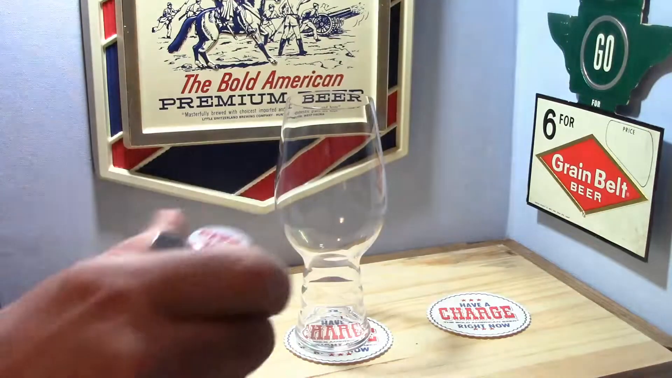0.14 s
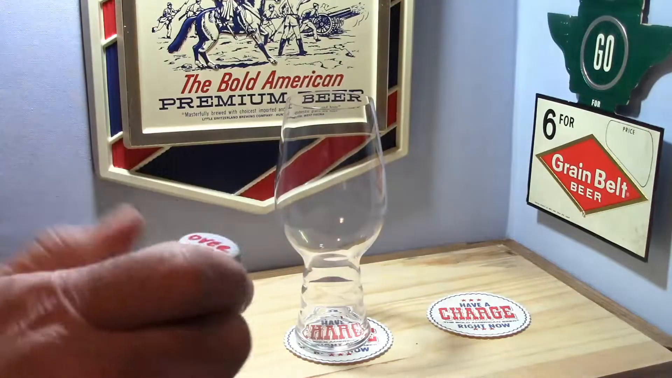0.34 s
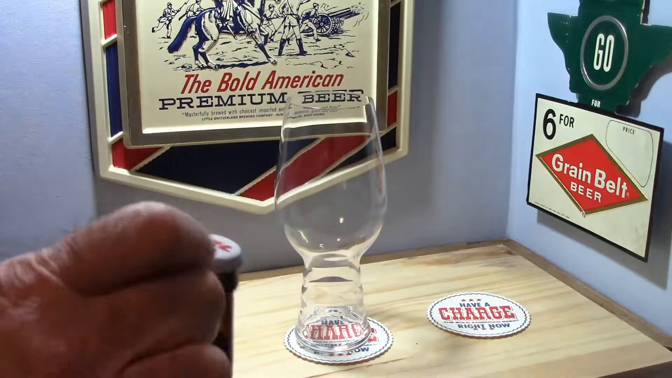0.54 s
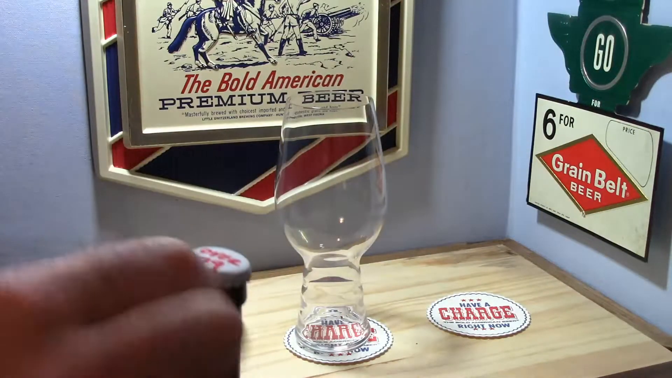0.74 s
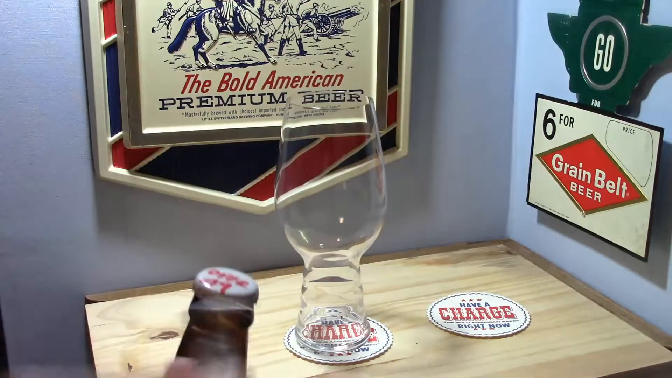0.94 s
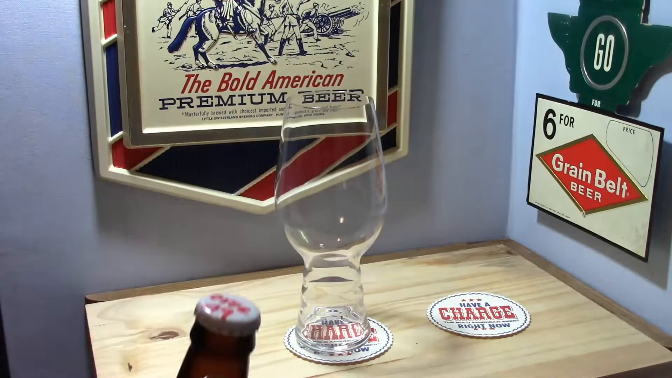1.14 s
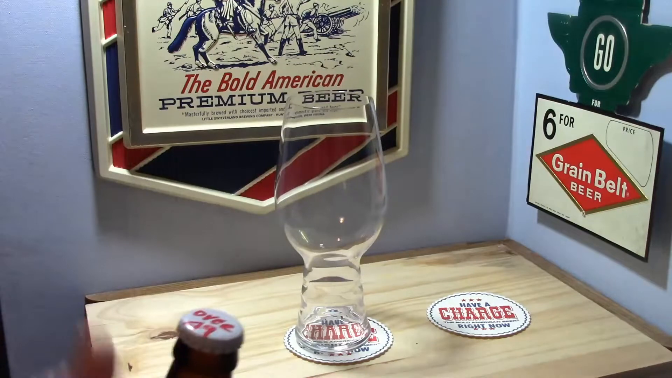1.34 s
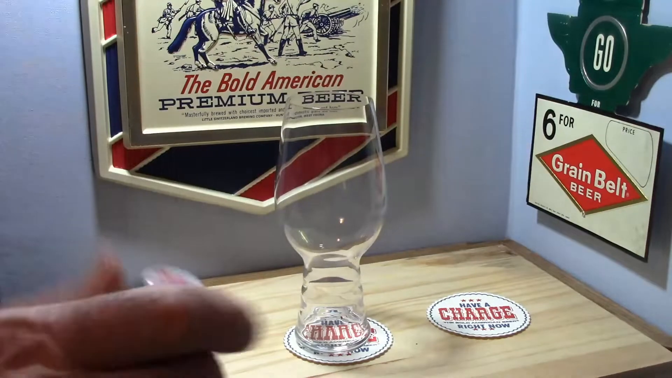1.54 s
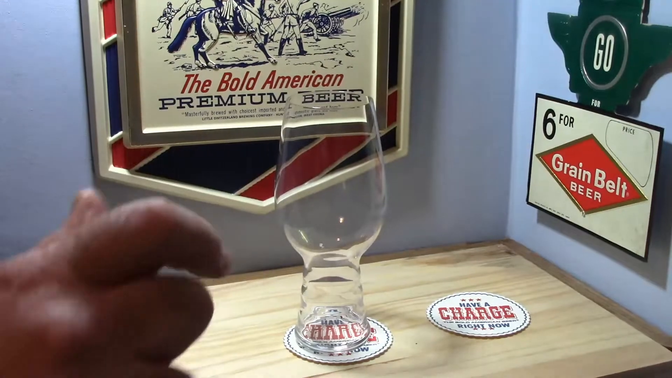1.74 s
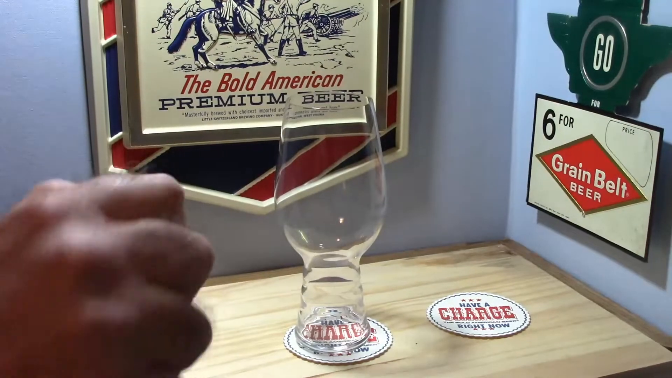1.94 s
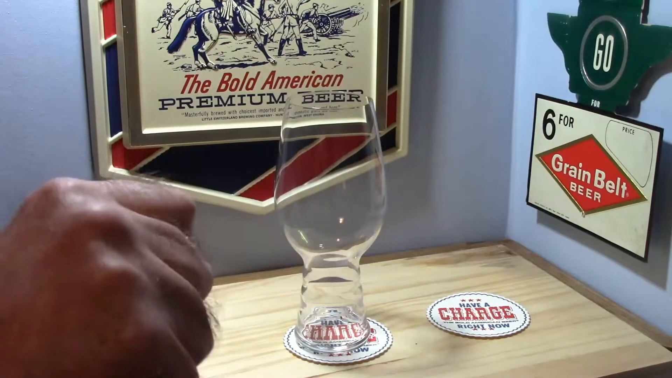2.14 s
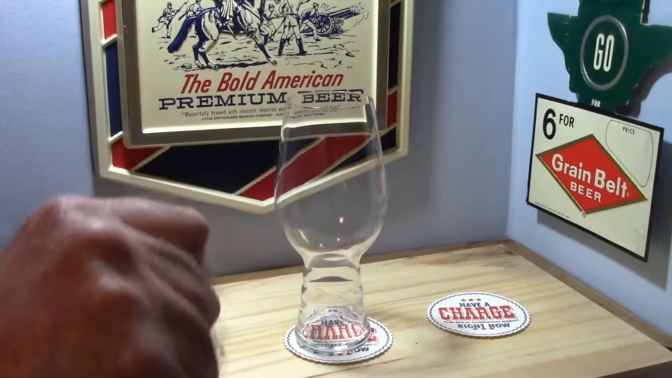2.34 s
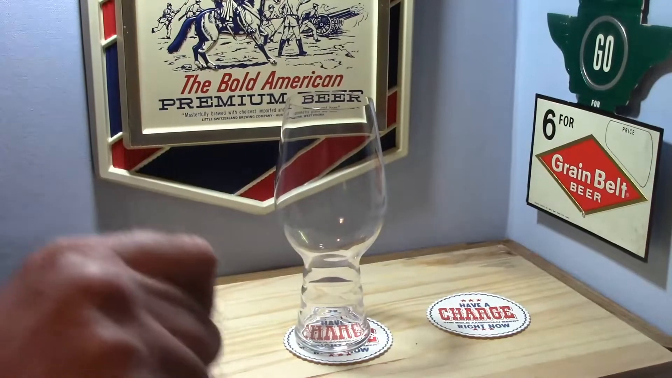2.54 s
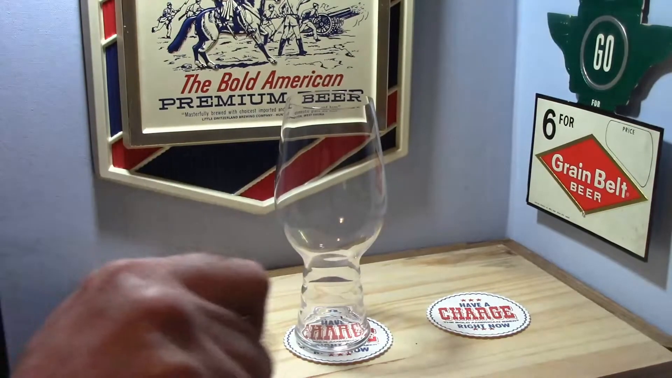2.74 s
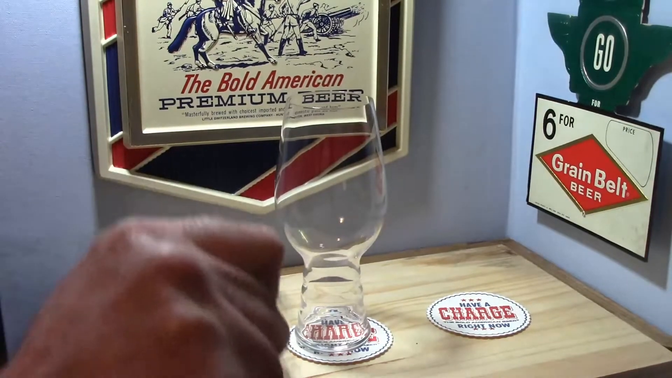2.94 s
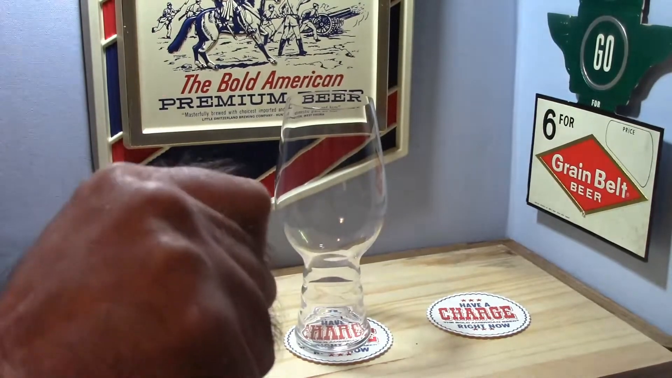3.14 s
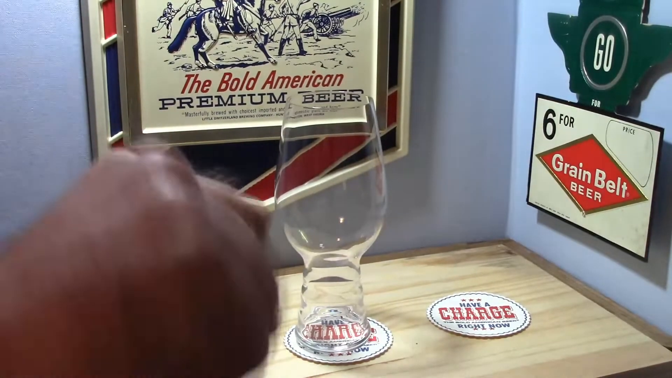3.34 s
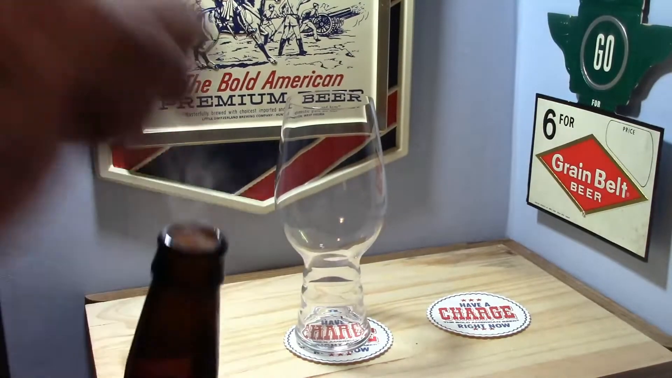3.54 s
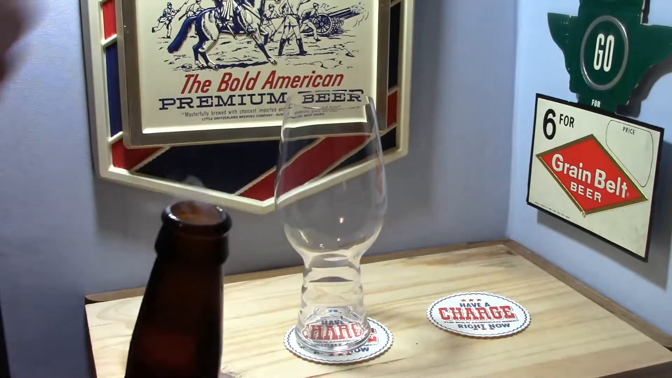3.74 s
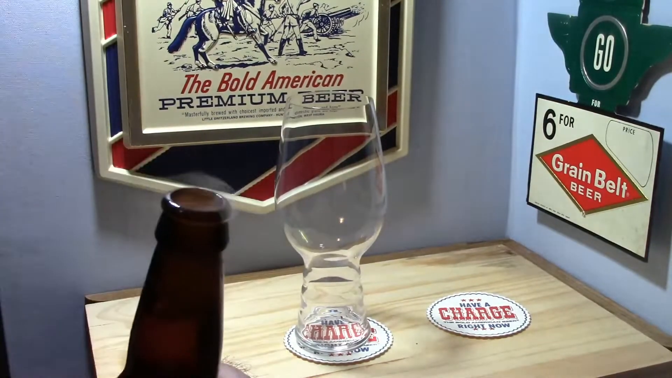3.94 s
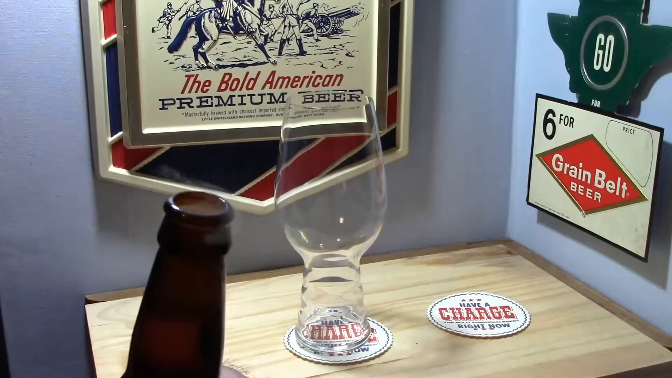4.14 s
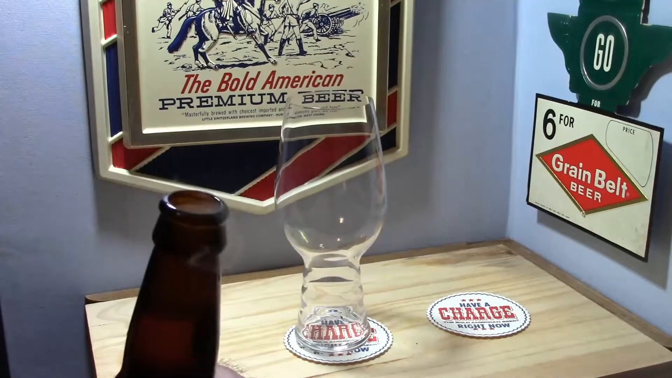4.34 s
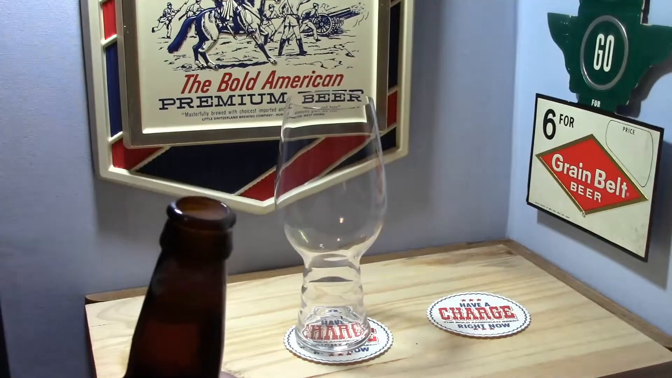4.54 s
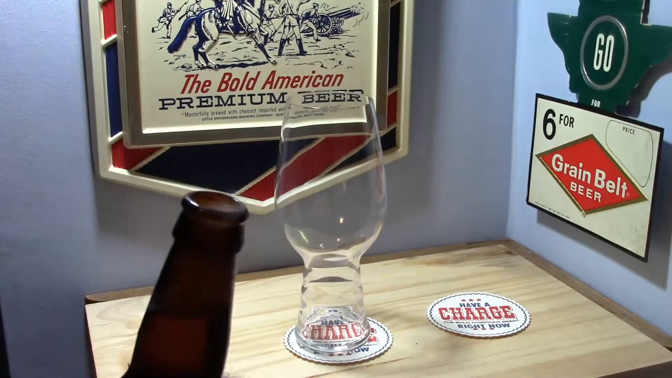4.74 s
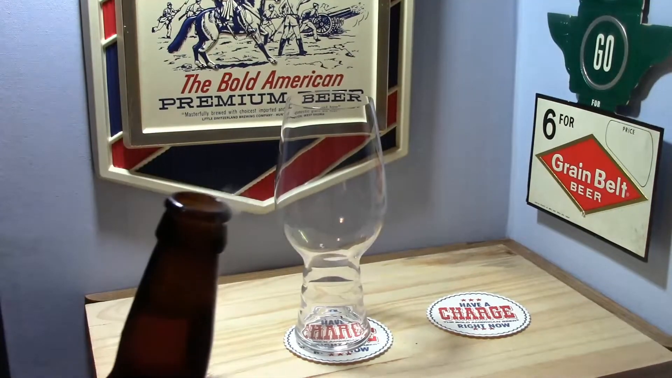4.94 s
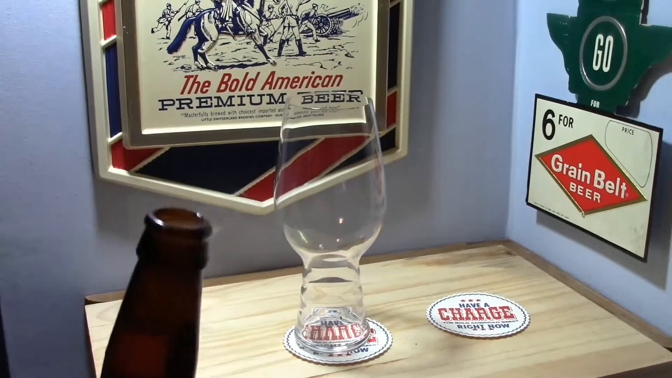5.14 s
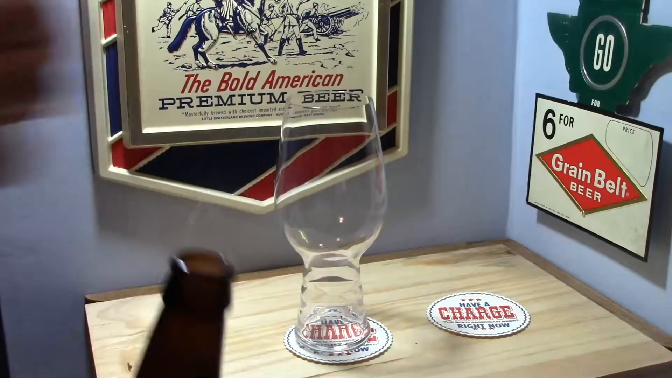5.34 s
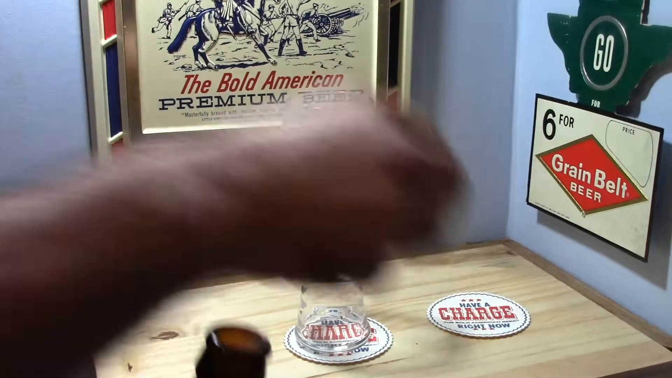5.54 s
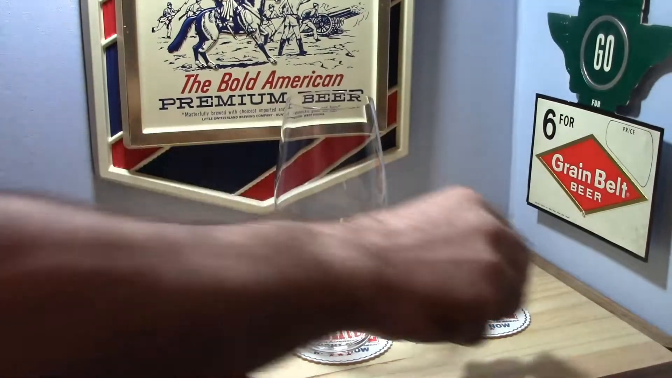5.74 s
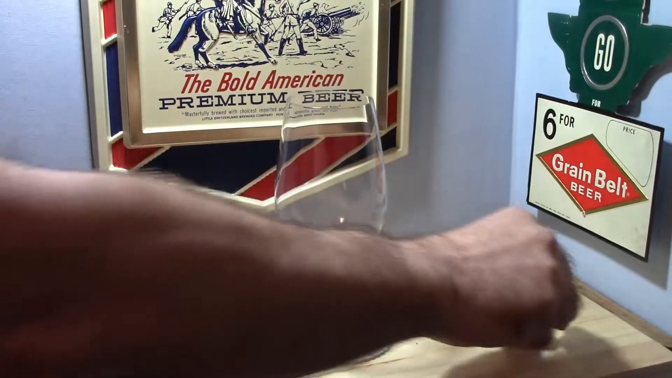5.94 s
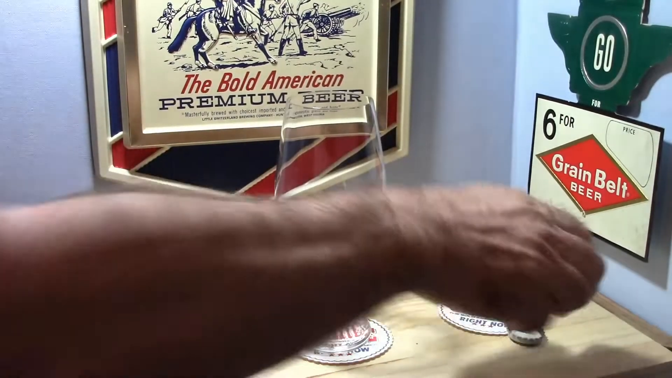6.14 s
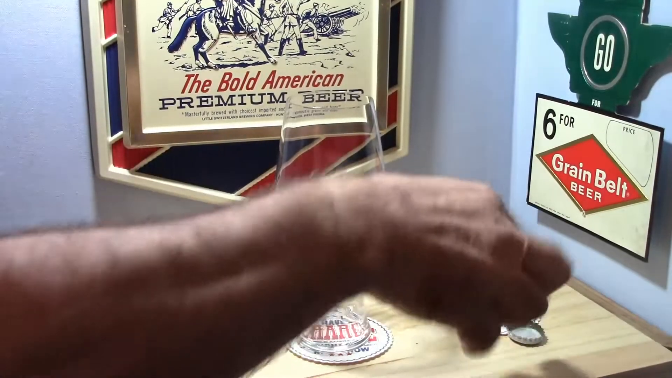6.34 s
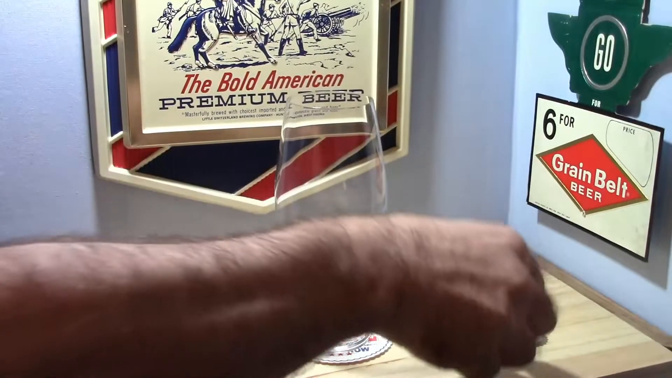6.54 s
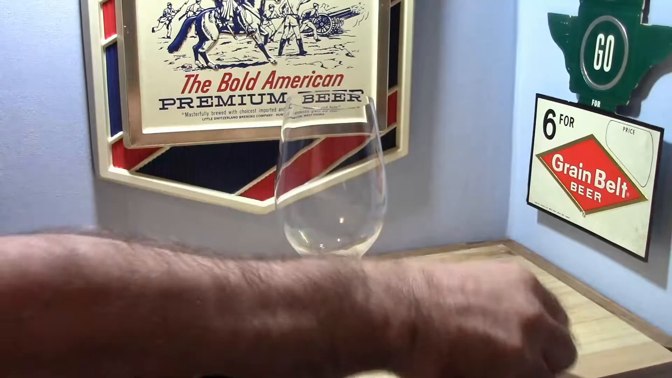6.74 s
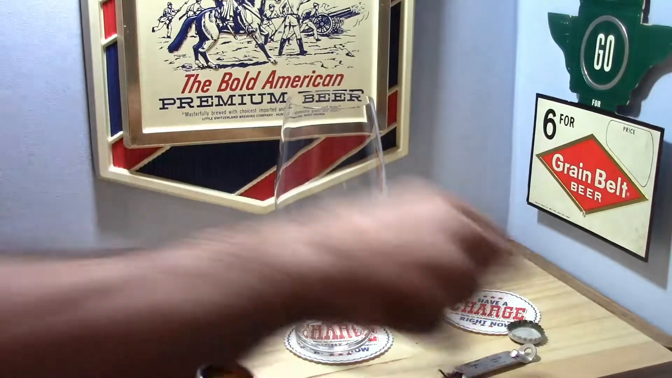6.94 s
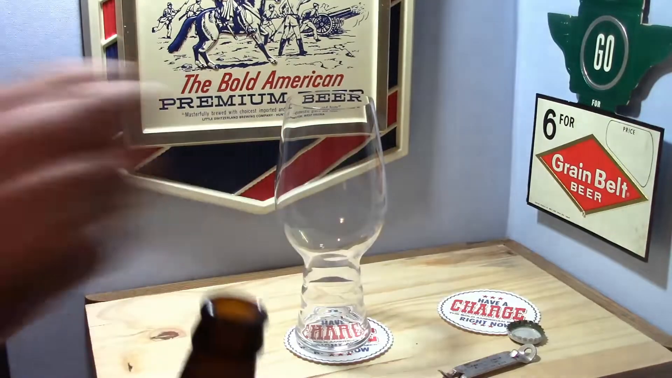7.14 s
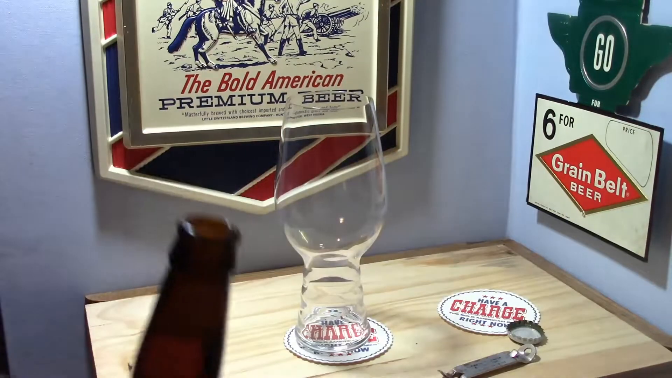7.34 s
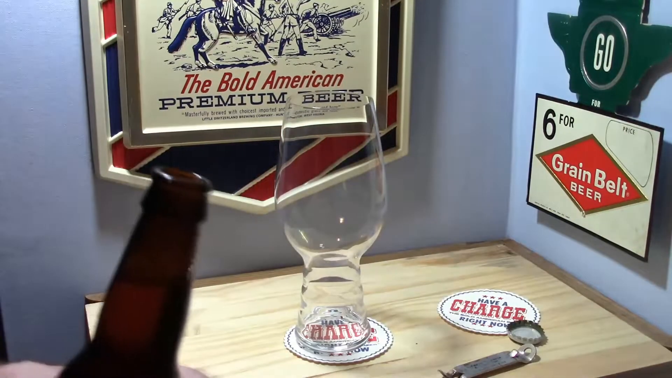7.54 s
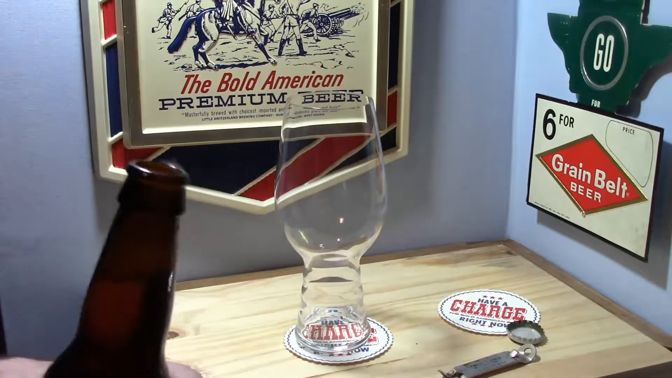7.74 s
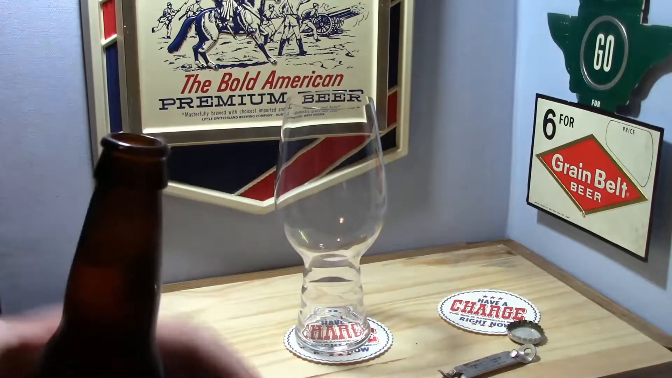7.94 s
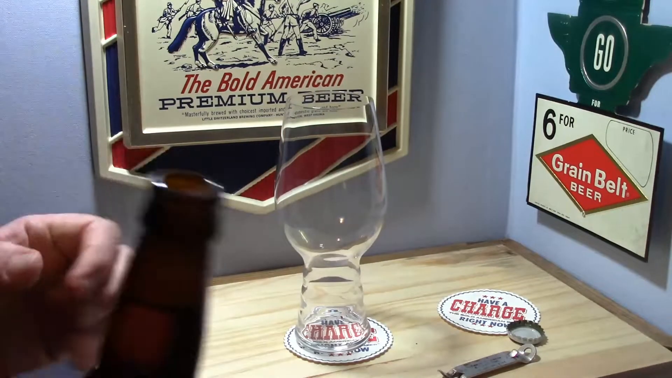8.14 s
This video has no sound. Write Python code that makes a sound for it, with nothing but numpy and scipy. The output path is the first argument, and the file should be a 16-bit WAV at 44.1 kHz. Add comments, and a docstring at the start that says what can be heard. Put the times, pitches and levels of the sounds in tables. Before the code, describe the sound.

A glass bottle is opened close to the microphone in a small indoor corner with short reflections, over faint hiss and slight sleeve rustle. From about 1.5 to 1.9 seconds a steel opener taps lightly on the cap a few times. At 3.3 seconds the seal breaks with a loud, very short hiss of gas, followed at 3.4 by a small hollow pop and a brief ring from the freed cap. Cap and opener click together in the hand around 3.5 seconds, then click again at 4.5 and scrape and rattle softly until 4.9. At 6 seconds the cap lands on a wooden shelf with a sharp, bright clink. Around 6.8 seconds the opener is put down with a loud, quick clatter on the wood. Only faint hiss and rustle remain until the end, just after 8 seconds.

```python
"""A steel opener taps and pries the crown cap off a glass bottle: gas whistles out of the gap, air in
the neck pops, the freed cap rings. Cap and opener rattle and scrape in the hand, then are laid on a
pine shelf in a narrow, reflective corner. Each contact is a broadband crack plus ringing modes.
A small camera close by hisses, its lens motor ticks, and sleeves rustle faintly."""
import sys
import numpy as np
from scipy import signal
from scipy.fft import rfft
from scipy.io import wavfile
from scipy.ndimage import uniform_filter1d

SR = 44100
rng = np.random.default_rng(int(sys.argv[2]) if len(sys.argv) > 2 else 0)


def to_wav(sig):
    """Store sig (one row per channel, or 1-D mono) as 16-bit WAV at the path in sys.argv[1].

    Samples outside -1..1 are clipped; the rate is SR.
    """
    pcm = np.clip(np.atleast_2d(sig), -1, 1) * 32767
    pcm = np.round(pcm).astype(np.int16)
    wavfile.write(sys.argv[1], SR, pcm.T)  # frames by channels


N = 361721

# Noise spectra: (frequency [Hz], relative density [dB])
HISS_SPECTRUM = [(12, -47), (20, -18), (74, -11.5), (113, -4), (301, -4), (328, -6.5), (357, 1.5),
                 (574, -10), (624, -6), (1260, -12), (2320, -15.5), (2750, -17), (16000, -33.5)]
CLOTH_SPECTRUM = [(12, -51.5), (20, -14), (113, 1), (422, 1.5), (472, -1), (718, -2.5), (1330, -8),
                  (8180, -19.5), (16000, -34.5)]
STEEL_SPECTRUM = [(300, -47), (900, -12.5), (2300, -7.5), (5000, -6), (6600, -4.5), (8000, -12),
                  (11000, -16), (14000, -26), (16000, -23)]
WOOD_SPECTRUM = [(30, -47.5), (100, -45.5), (270, -36.5), (900, 0), (2000, 0.5), (3500, -6), (6300, -16.5),
                 (9000, -32), (12000, -60), (16000, -70.5)]
JET_SPECTRUM = [(18, -86.5), (30, -36.5), (194, -37.5), (540, -24.5), (1280, -25.5), (1430, -14),
                (1810, -8.5), (2060, -4.5), (3140, -1.5), (3670, -5), (6550, -5), (13000, -17),
                (16000, -23.5)]
# Background stereo image: (frequency [Hz], left-right correlation [-])
CORRELATION = [(60, 0.28), (130, 0.61), (290, 0.2), (640, 0.39), (1410, 0.44), (3100, 0.42), (6820, 0.95),
               (15000, 0.92)]
# Sleeve and skin movement: (time [s], level [dB])
RUSTLE_LEVELS = [(0, -57.5), (1.3, -56.5), (1.6, -59), (2.2, -64), (4.2, -66), (4.9, -61), (5.7, -60.5),
                 (6.3, -66), (6.95, -67), (7.1, -61.5), (7.28, -58.5), (7.4, -69.5), (8.21, -65.5)]
# Corner reflections: (frequency [Hz], T60 [s])
CORNER_DECAY = [(100, 0.083), (300, 0.25), (700, 0.2), (1500, 0.16), (3000, .16), (6000, .14), (12000, .12)]
# Corner width: (frequency [Hz], side re mid [dB])
CORNER_WIDTH = [(60, -13.5), (250, -24.5), (700, -25), (1500, -23.5), (3000, -21), (6000, -19.5),
                (10000, -12), (15000, -5)]
# Cap and shelf resonances: (frequency [Hz], level [dB], T60 [s])
SEATED_CAP_MODES = [(3350, 0, .04), (6210, -5, .035), (3140, -7, .03), (3450, -9, .025), (1500, -2, .008),
                    (2950, -9, .012), (5300, -16, .01), (6450, -10, .012), (7850, -2, .012),
                    (9400, -14, .01), (10300, -12, .01)]
HELD_CAP_MODES = [(2410, -5, 0.021), (2670, 23, 0.0025), (3660, 15, 0.0058), (4700, 14, 0.002),
                  (5800, 20, 0.0035), (6376, 9, 0.029), (6830, -52.5, 0.0091), (9640, 5, 0.0018),
                  (10000, 4, .006), (12800, -5, .006)]
LOOSE_CAP_MODES = [(6277, 0, .05), (6335, -4, .045), (5260, -18, .015), (3800, -16, .015),
                   (10070, -26, .02)]
SHELF_MODES = [(299, -14, .3), (1091, -1, .13), (1321, -1, .16), (1996, -7, .1), (2030, -3, .14),
               (145, -28, .1), (503, -12, .08), (622, -6.5, .1), (795, -6.5, .1), (1583, -7, .04),
               (1776, -6, .05), (2370, -10, .04), (2960, -11, .04), (3220, -13, .05), (3600, -15, .03),
               (4540, -24, .03), (5300, -26, .03), (6280, -26, .04)]
# Contacts: (time [s], strength [dB], favoured pitch [Hz], chatter decay [s])
OPENER_TAPS = [(1.536, -45.5, 3540, 0.0039), (1.7462, -29, 4780, 0.0048), (1.8655, -21, 3520, 0.0021),
               (1.878, -28, 3050, 0.0015), (1.9105, -43.5, 2610, 0.0025)]
HAND_RATTLES = [(3.402, -29.5, 5700, 0.002), (3.5025, -32, 3000, 0.013), (3.559, -35, 5930, .006),
                (3.5628, -26.5, 6300, 0.0054), (4.4915, -23.5, 6200, 0.0063), (4.551, -43, 3980, 0.01),
                (4.6525, -42.5, 3230, 0.015), (4.816, -49, 2570, .006), (4.8305, -33, 2000, .0043),
                (4.852, -40, 2740, 0.0057)]
CAP_LANDINGS = [(6.0276, -10.5, 6300, .006), (6.035, -14, 6300, 0.0034), (6.044, -17, 6280, 0.0044)]
SHELF_KNOCKS = [(5.549, -47.5, 755, .016), (6.029, -24.5, 3447, .023), (6.034, -27, 1032, 0.0137),
                (6.706, -25, 800, .013), (6.7545, -15.5, 1020, .018), (6.7735, -7, 2110, .011),
                (6.785, -11, 1359, .013)]  # knuckle, cap, opener
FINGER_TOUCHES = [(1.107, -57.5, 6800, .0053), (1.419, -55, 2460, 0.011), (2.057, -42.5, 1670, 0.0038),
                  (2.38, -49, 3550, 0.0054), (3.859, -59.5, 4500, .006), (4.374, -54, 2350, .011),
                  (5.309, -64, 6910, .0098), (5.425, -53, 3450, 0.019), (7.799, -65, 7500, 0.0052),
                  (7.849, -65, 7600, .005), (7.925, -66, 7000, 0.0085)]
# Air in the neck: (time [s], level [dB], final pitch [Hz], T60 [s])
NECK_POPS = [(3.398, -27.5, 665, .13), (3.503, -45, 1013, 0.12)]
# Freed cap: (time [s], level [dB], frequency [Hz], T60 [s])
CAP_RINGS = [(3.407, -28, 2440, 0.085)]
# Contact types: (ring re crack [dB], tilt at 2 kHz favoured pitch [dB/oct],
# tilt change per octave of that pitch [dB/oct], rise at -30 dB [s], left re right [dB])
TAP, RATTLE = (9.5, -8.5, 9.5, .0016, .5), (2, .66, .18, .0015, -.3)
DROP, KNOCK, TICK = (6.5, -3.1, 1.5, .0018, -2.5), (5.5, -1, 5.5, .0022, .16), (-6, -2.1, 4.5, .0009, .4)


def gain_of(db):
    return 10 ** (np.asarray(db) / 20)


def unit_rms(x):
    return x / np.sqrt(np.mean(x ** 2) + 1e-20)


def curve_at(points, hz):
    points_hz, values = np.transpose(points)
    return np.interp(np.log(hz + 1), np.log(points_hz + 1), values)


def coloured(x, spectrum):
    """Causal filter with the given spectrum."""
    hz = abs(np.fft.fftfreq(4096, 1 / SR))
    log_gain = np.log(gain_of(np.maximum(curve_at(spectrum, hz), -100)))
    taps = np.fft.ifft(np.exp(np.conj(signal.hilbert(log_gain)))).real[:2048]
    return signal.fftconvolve(x, taps)[:len(x)]


def resonate(x, hz, width_hz):
    """Resonator; the centre may glide."""
    carrier = np.exp(2j * np.pi * np.cumsum(hz * np.ones(len(x))) / SR)
    pole = np.exp(-np.pi * width_hz / SR)
    return 2 * (carrier * signal.lfilter([1 - pole], [1, -pole], x / carrier)).real


def place(mix, start_s, sound, pan_db=0., corner_db=0.):
    """Adds direct sound plus corner reflections, drawn anew per event."""
    echoes = rng.choice([-1., 1.], (2, SR // 2)) * (rng.random((2, SR // 2)) < .1)
    echoes[:, :60] = 0
    hz, t, spectra = signal.stft(echoes, SR, nperseg=256)
    spectra *= gain_of(-60 * t / curve_at(CORNER_DECAY, hz)[:, None])
    spectra[1] *= gain_of(curve_at(CORNER_WIDTH, hz))[:, None]
    response = signal.istft(spectra, SR, nperseg=256)[1]
    wet = gain_of(corner_db)
    response *= np.array([[wet], [np.hypot(1, wet)]]) / np.linalg.norm(response[0])
    response[0, 0] = 1  # direct path
    mid, side = signal.fftconvolve(sound[None], response, axes=1)
    stereo = np.array([mid + side, mid - side]) * gain_of([[pan_db / 2], [-pan_db / 2]])
    span = mix[:, round(start_s * SR):][:, :len(mid)]
    span += stereo[:, :span.shape[1]]


def hiss_and_rustle(hiss_db=-60.5):
    """Microphone and room hiss; cloth rustle swells over it."""
    frames, hz = N // 128 + 5, np.fft.rfftfreq(512, 1 / SR)
    left_re, left_im, other_re, other_im, flicker = rng.standard_normal((frames, 257, 5)).T
    flicker = unit_rms(uniform_filter1d(uniform_filter1d(flicker, 30, 0), 10, 1))
    correlation = curve_at(CORRELATION, hz)[:, None]
    left = left_re + 1j * left_im
    right = correlation * left + np.sqrt(1 - correlation ** 2) * (other_re + 1j * other_im)
    rustle_db = np.interp(np.arange(frames) * 128 / SR, *np.transpose(RUSTLE_LEVELS))
    hiss = gain_of(hiss_db + .18 * flicker) * unit_rms(gain_of(curve_at(HISS_SPECTRUM, hz)))[:, None]
    cloth = gain_of(rustle_db + 1.4 * flicker) * unit_rms(gain_of(curve_at(CLOTH_SPECTRUM, hz)))[:, None]
    spectra = np.array([left, right]) * np.hypot(hiss, cloth)
    noise_rms = np.std(signal.istft(left, nperseg=512, noverlap=384)[1])
    sound = signal.istft(spectra, nperseg=512, noverlap=384)[1][:, :N] / noise_rms
    return sound * gain_of([[.45], [-.45]])


def lens_motor(first_s=.0265, rate_hz=15000 / 1001, tick_db=-75, whine_hz=5561, whine_db=-83):
    """Steady steps ring the camera body; a thin whine wavers."""
    onsets = np.round(np.arange(first_s, N / SR, 1 / rate_hz) * SR).astype(int)
    steps = np.zeros(N)
    steps[onsets] = gain_of(rng.normal(0, 1.5, len(onsets)))
    bursts = signal.oaconvolve(steps, np.hanning(420))[:N] * rng.standard_normal(N)
    body = resonate(resonate(bursts, 2200, width_hz=600), 2100, width_hz=980)
    whine = resonate(rng.standard_normal(N), whine_hz, width_hz=15)
    return gain_of(tick_db) * unit_rms(body) + gain_of(whine_db) * unit_rms(whine)


def strike(modes, crack_spectrum, ring_db, tilt_db_oct, favoured_hz, rise_s, chatter_s):
    """Contact and chatter excite the modes; the chatter alone is a broadband crack."""
    t = np.arange(SR // 4) / SR
    chatter = rng.standard_normal(len(t)) * (rng.random(len(t)) < .3)
    chatter *= (1 - np.exp(-t / rise_s)) * np.exp(-t / chatter_s)
    force = chatter / np.linalg.norm(chatter)
    force[round(rise_s * SR)] += 1.7 * np.exp(-rise_s / .0019)  # impulse, weak in a slow touch
    octaves = np.linspace(-4, 4, 33)
    hz = 1000 * 2 ** octaves
    spot_db = 7.1 * np.exp(-(np.log2(hz / favoured_hz) / .43) ** 2)  # struck spot favours some modes
    touch_db = tilt_db_oct * np.maximum(octaves, -1.1) + spot_db - 9 * (hz / 13000) ** 4
    touch = np.transpose([hz, touch_db])
    power, bins_hz = abs(rfft(force)) ** 2, np.fft.rfftfreq(len(t), 1 / SR)
    response = np.zeros(len(t))
    for mode_hz, db, t60_s in modes:
        band = 1 / (1 + ((bins_hz - mode_hz) * t60_s) ** 2)
        drive = np.sqrt(power @ band / band.sum())  # divided out to hold the mode balance
        detuned_hz = mode_hz * rng.normal(1, .0025)
        response += gain_of(db - 60 * t / t60_s) / drive * np.sin(2 * np.pi * detuned_hz * t)
    ring = signal.fftconvolve(coloured(force, touch), response)[:len(t)]
    crack = coloured(coloured(chatter, touch), crack_spectrum)
    sound = gain_of(ring_db) * ring / np.linalg.norm(ring) + crack / np.linalg.norm(crack)
    return sound / np.sqrt(uniform_filter1d(sound ** 2, size=200).max())


def contacts(mix, events, kind, modes, crack_spectrum, cutoff_hz, corner_db):
    """Higher spots strike harder, softer blows build slower; small bodies radiate little bass."""
    ring_db, base_tilt_db_oct, tilt_change, base_rise_s, pan_db = kind
    radiation = signal.butter(2, cutoff_hz, "high", fs=SR)
    for start_s, db, favoured_hz, chatter_s in events:
        tilt_db_oct = base_tilt_db_oct + tilt_change * np.log2(favoured_hz / 2000)
        rise_s = base_rise_s * 2 ** (-(db + 30) / 14)  # doubles per 14 dB softer
        blow = strike(modes, crack_spectrum, ring_db, tilt_db_oct, favoured_hz, rise_s, chatter_s)
        place(mix, start_s, signal.lfilter(*radiation, gain_of(db) * blow), pan_db, corner_db)


def rim_scrape(mix, start_s=4.678, level_db=-43, rise_s=.017, hold_s=.026, fade_s=.036):
    """The crimped rim drags over the opener; uneven slips ring the held cap."""
    knots_s = np.cumsum([0, rise_s, hold_s, fade_s])
    db = level_db + np.interp(np.arange(0, knots_s[-1], 1 / SR), knots_s, [-9, 0, 1.5, -40])
    slips = rng.standard_normal(len(db)) * gain_of(1.5 * rng.exponential(1, len(db)))
    slips *= rng.random(len(db)) < .3
    slips = coloured(slips, [(1000, -9), (2500, 0), (6000, 7), (10000, -4.5), (16000, -30)])
    ring = sum(gain_of(mode_db) * resonate(slips, hz, np.log(1000) / np.pi / t60_s)
               for hz, mode_db, t60_s in HELD_CAP_MODES)
    place(mix, start_s, gain_of(db) * unit_rms(unit_rms(ring) + .55 * unit_rms(slips)), corner_db=-.5)


def freed_cap(mix):
    """The cap comes off ringing in one damped mode."""
    t = np.arange(SR // 5) / SR
    for start_s, db, hz, t60_s in CAP_RINGS:
        place(mix, start_s, gain_of(db - 60 * t / t60_s) * np.sin(2 * np.pi * hz * t), corner_db=-8)


def neck_pops(mix, rise_s=.012, flat_fraction=.1):
    """Air in the neck resonates, starting flat and climbing to pitch as it swells."""
    t = np.arange(SR // 5) / SR
    attack = np.minimum(t / rise_s, 1)
    for start_s, db, final_hz, t60_s in NECK_POPS:
        hz = final_hz * (1 - flat_fraction * (1 - attack))
        breath = .75 * unit_rms(resonate(rng.standard_normal(len(t)), hz, width_hz=130))
        tone = np.sqrt(2) * np.sin(2 * np.pi * np.cumsum(hz) / SR)
        envelope = attack * gain_of(db - 60 * (t / t60_s) ** 1.4)
        place(mix, start_s, envelope * (tone + breath), corner_db=-12)


def gas_jet(mix, seal_s=3.306, full_s=3.338, hold_s=.012, free_s=3.41, full_db=-12.5, leak_db=-38):
    """The seal cracks; a sputtering jet swells, holds, then drains to a leak until the cap is free."""
    swell_db_s, drain_db_s, end_db_s = 1500, 930, 1398
    t = seal_s + np.arange(SR // 6) / SR
    db = np.maximum(full_db - drain_db_s * np.maximum(t - full_s - hold_s, 0), leak_db)
    db -= swell_db_s * np.maximum(full_s - t, 0)
    db -= end_db_s * np.maximum(t - free_s, 0)
    gap_hz = np.interp(t, [full_s - .0125, full_s + .0125], [2400, 1890])  # falls as the gap widens
    noise = rng.standard_normal(len(t))
    sputter = gain_of(1.6 * unit_rms(uniform_filter1d(rng.standard_normal(len(t)), 60)))
    jet = signal.lfilter(*signal.butter(1, 300, "high", fs=SR), coloured(noise, JET_SPECTRUM))
    gap_whistle = .5 * unit_rms(resonate(noise, gap_hz, width_hz=340))
    high_whistle = .45 * unit_rms(resonate(noise, 6100, width_hz=590))
    gas = unit_rms(sputter * (unit_rms(jet) + gap_whistle + high_whistle))
    place(mix, seal_s, gain_of(db) * gas, pan_db=-1.2)


def scene():
    mix = np.zeros((2, N))
    skin_spectrum = [(300, 12), (1500, 5.5), (4000, 3), (9000, -3), (16000, -33)]
    contacts(mix, OPENER_TAPS, TAP, SEATED_CAP_MODES, STEEL_SPECTRUM, cutoff_hz=1100, corner_db=-3)
    contacts(mix, HAND_RATTLES, RATTLE, HELD_CAP_MODES, STEEL_SPECTRUM, cutoff_hz=1500, corner_db=-1.5)
    contacts(mix, CAP_LANDINGS, DROP, LOOSE_CAP_MODES, STEEL_SPECTRUM, cutoff_hz=1500, corner_db=-3)
    contacts(mix, SHELF_KNOCKS, KNOCK, SHELF_MODES, WOOD_SPECTRUM, cutoff_hz=260, corner_db=-6)
    contacts(mix, FINGER_TOUCHES, TICK, HELD_CAP_MODES, skin_spectrum, cutoff_hz=300, corner_db=-4)
    rim_scrape(mix)
    gas_jet(mix)
    neck_pops(mix)
    freed_cap(mix)
    return mix + hiss_and_rustle() + lens_motor()


def record(dry):
    """Capsule low cut, input-stage soft clip, band limit."""
    low_cut_hz, high_cut_hz = 72, 15800
    capsule = signal.lfilter(*signal.butter(2, low_cut_hz, "high", fs=SR), dry)
    clipped = capsule / (1 + capsule ** 6) ** (1 / 6)
    lowpass = signal.firwin(511, high_cut_hz, window=("kaiser", 9), fs=SR)
    return signal.oaconvolve(clipped, lowpass[None], "same")


dry = scene()
out = record(dry)
to_wav(out)
```